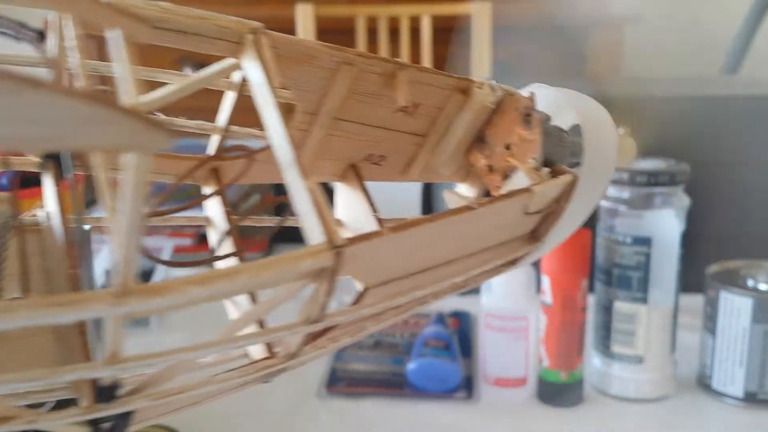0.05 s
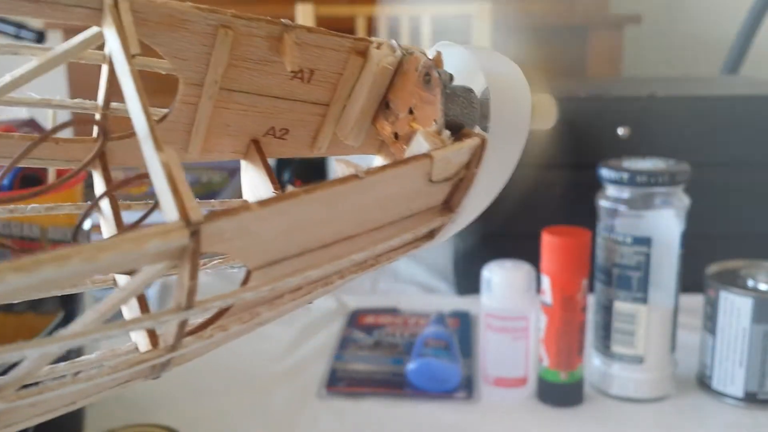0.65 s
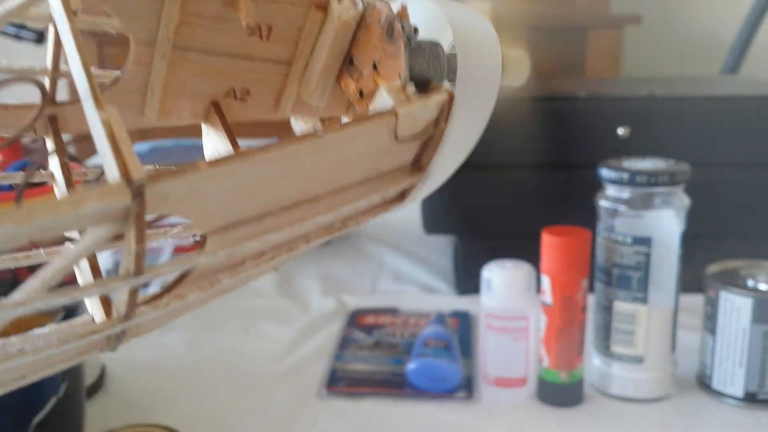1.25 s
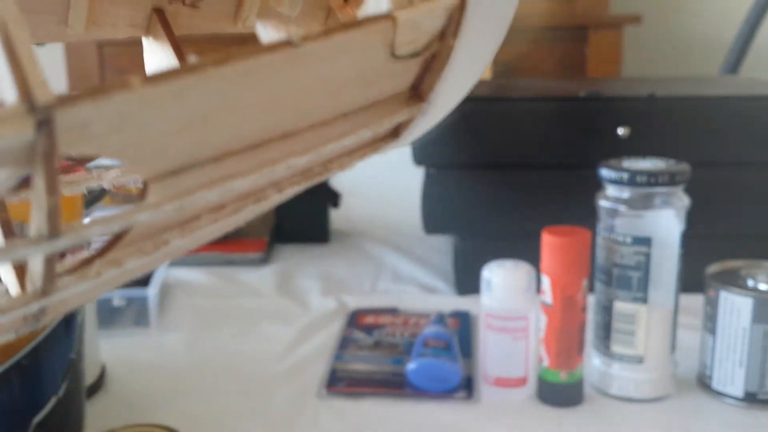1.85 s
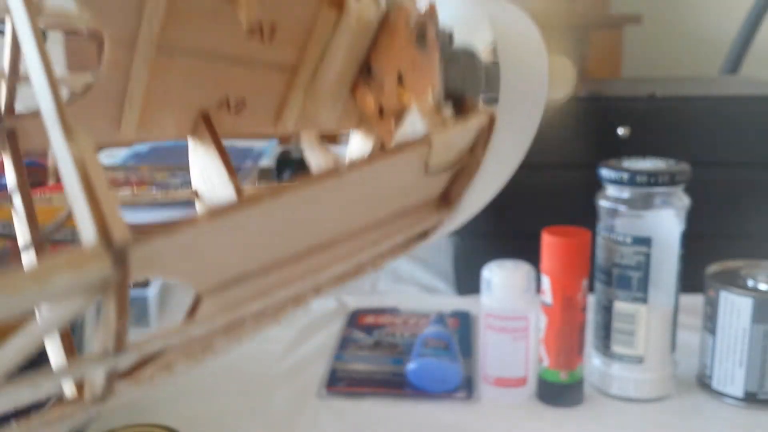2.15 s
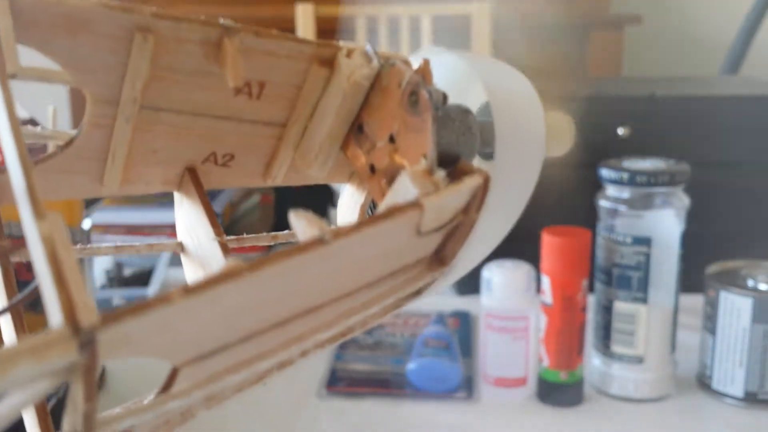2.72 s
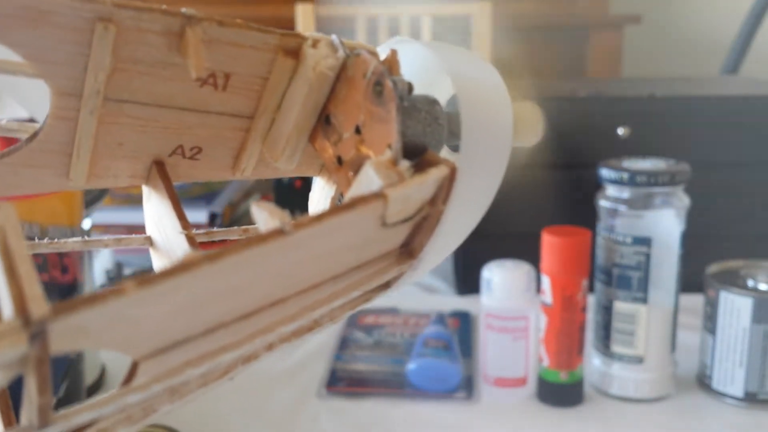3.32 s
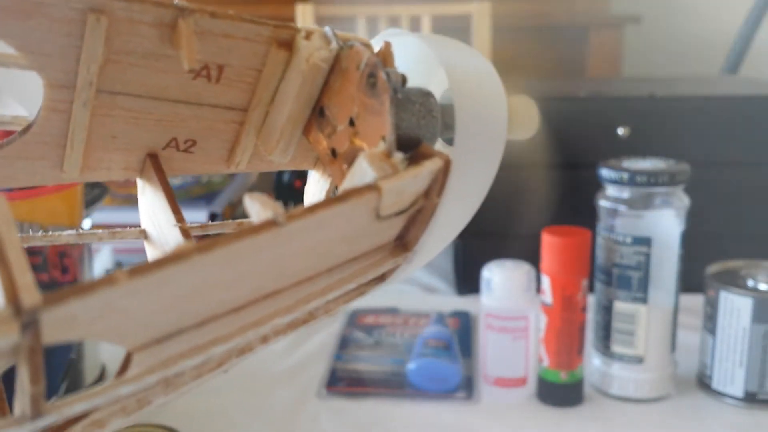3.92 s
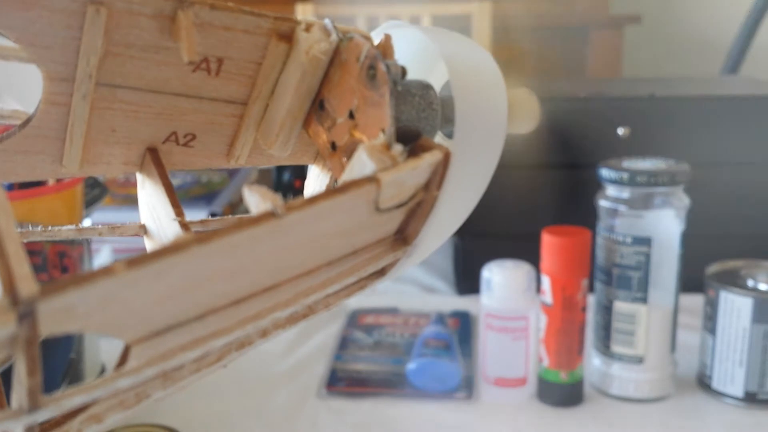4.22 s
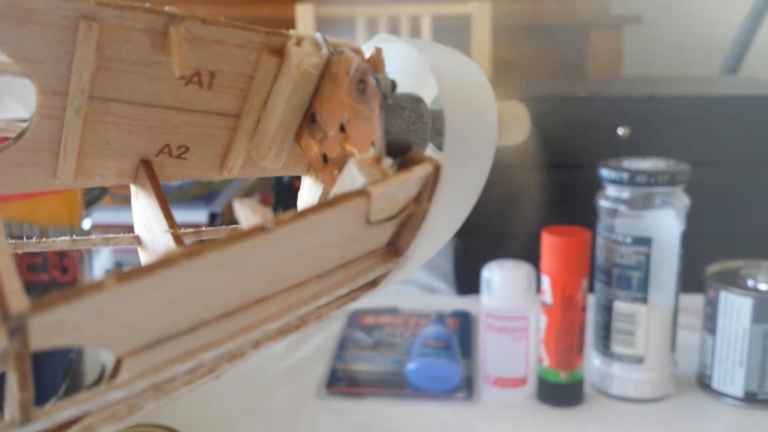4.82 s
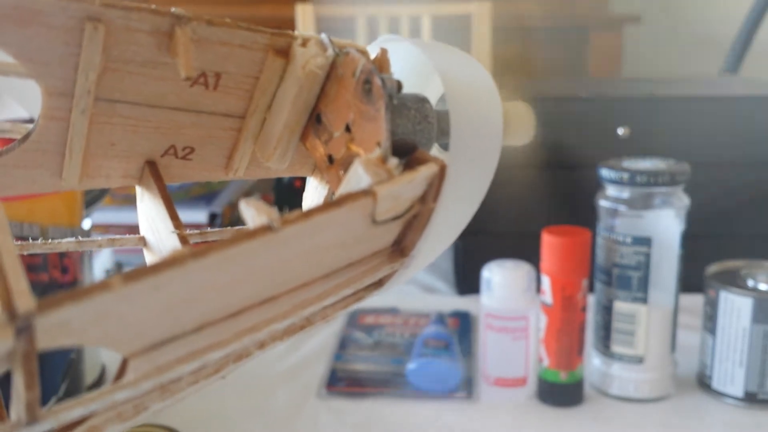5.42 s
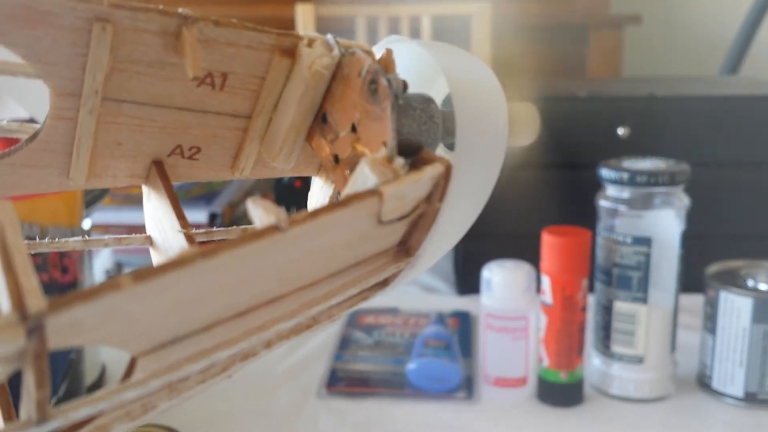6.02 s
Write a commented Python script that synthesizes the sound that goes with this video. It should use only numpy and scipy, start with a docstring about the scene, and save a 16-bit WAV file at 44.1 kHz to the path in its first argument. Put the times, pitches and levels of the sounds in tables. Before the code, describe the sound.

Rapid little pops and crisp metallic ticks come from a model aircraft engine running without a break, close by and a little to the right. The pulses carry a slight hiss and set a small room humming faintly. The pace eases a little from start to finish, and three barely audible thuds of a shifting grip fall from about halfway on, over a faint background rumble.

```python
"""A tiny gas-driven piston engine ticks over in a hand-held balsa model aircraft above a workbench.
From the start it is close to the right microphone, turning about 19 times a second. Each turn gives an
exhaust puff, a rattling click of the inlet valve, then a faint tick of play in the crank. As it slows,
its pulses sweep through the low notes of a small room, which hum. From 2.7 s on, the hand softly bumps
the model three times. By the end the engine is down to about 17 turns a second."""
import sys
import numpy as np
from scipy import signal
from scipy.io import wavfile
from scipy.ndimage import map_coordinates

SR = 44100
rng = np.random.default_rng(int(sys.argv[2]) if len(sys.argv) > 2 else 0)


def wav_record(signal):
    """Record a signal, one row per channel, as 16-bit PCM in the file named by sys.argv[1]."""
    frames = np.transpose(np.atleast_2d(signal))
    bounded = np.clip(frames, -1, 1)
    # unit amplitude maps onto the largest positive 16-bit level
    quanta = np.round(bounded * 32767).astype(np.int16)
    wavfile.write(sys.argv[1], SR, quanta)


N = 271642
TIME = np.arange(N) / SR

# how fast the shaft turns: (time [s], speed [turns per second])
SHAFT_SPEED = [(0.0, 19.033), (0.94, 18.522), (1.73, 18.22), (2.37, 18.521), (2.93, 18.161), (3.83, 17.985),
               (4.73, 17.571), (5.12, 17.259), (5.76, 17.19), (6.16, 16.859)]
# how loud the strokes are as the model is moved about: (time [s], level [dB])
STROKE_LOUDNESS = [(0, -1.1), (1.1, -0.65), (1.7, 1.94), (2.9, 0.25), (3.3, 0.97), (4.3, 0.9), (5.3, -1.5),
                   (6.1, 1.4)]
# tone of the push of gas: (frequency [Hz], level [dB])
PUSH_TONE = [(20.0, -15.0), (40.0, -15.0), (80.0, -15.0), (150.0, 11.5), (280.0, 8.6), (560.0, 5.4),
             (900.0, 3.9), (1250.0, 5.5), (1600.0, -15.0), (2100.0, -0.6), (3000.0, -4.6), (6000.0, -16.6),
             (15000.0, -36.6)]
# ringing notes of the exhaust port and cylinder: (frequency [Hz], width [Hz], level [dB])
PORT_NOTES = [(1800, 108, -4), (2890, 172, 7.5), (3330, 1230, 0.5), (4370, 690, 0.5), (5354, 440, -6),
              (7210, 700, 0.5), (8540, 460, 6), (9000, 1000, -7.5)]
# tone of the hissing jet: (frequency [Hz], level [dB])
JET_TONE = [(200, -7.5), (1000, -7), (2200, -3), (3000, -10), (5000, 5), (7000, -1), (9700, 5), (10800, -5),
            (12000, 0.5), (13500, -5), (14500, -9), (16000, -48)]
# knocks within one turn: (delay after the exhaust [turns], level [dB], random spread [dB])
KNOCKS = [(.396, 0, .7), (.414, -4, 1.2), (.423, -3, 1.2), (.436, -5, 1.2), (.465, -17, 2),
          (.642, -14, 1.5), (.656, -20, 2)]
# ringing notes of the valve and cylinder head: (frequency [Hz], width [Hz], level [dB])
HEAD_NOTES = [(2920, 174, 2.5), (4570, 880, -2), (4845, 580, 7), (5740, 2480, 4.5), (6890, 1290, 8.5),
              (8730, 544, 8), (10600, 550, -28), (11390, 620, -1.5), (12300, 410, 2), (13150, 480, 0),
              (14100, 1200, -2.5)]
# dulling at the left microphone, shaded by the case it sits in: (frequency [Hz], level [dB])
LEFT_SHADE = [(100, -6), (550, -4.5), (1200, -0.5), (2800, -13), (4200, -17), (6000, -14.5), (8500, -25),
              (11000, -8.5), (14000, -15)]
# sound thrown past the microphone into the room as the model is turned: (time [s], level [dB])
ROOM_SPILL = [(0, -4.5), (1.1, -6), (1.7, -8.5), (3, -8), (4.5, -8), (6.1, -8)]
# tone of the room's echoes: (frequency [Hz], level [dB])
ECHO_TONE = [(60, -82), (310, -32), (450, -2.5), (800, 1), (1400, -5), (1900, -5), (2900, -5.5),
             (4200, -3.5), (6300, -1.5), (8500, -7.5), (11000, -2.5), (14000, -2.5), (16000, -14)]
# how long the echoes last: (frequency [Hz], time to fade by 60 dB [s])
ECHO_FADE = [(200, 0.19), (1000, 1), (4000, 0.38), (8000, 0.2), (15000, 0.24)]
# the room's own low notes:
# (frequency [Hz], level [dB], time to fade by 60 dB [s], sign at the microphones [+1 or -1])
ROOM_NOTES = [(145.5, -42.5, 0.16, 1), (189.8, -40.7, 0.4, 1), (231.2, -38.7, 0.17, 1),
              (255.9, -35.9, 0.2, 1), (283.8, -36.0, 0.18, 1), (316.7, -40.0, 0.26, 1),
              (345.7, -50.7, 0.35, 1), (361.2, -44.8, 0.12, 1), (397.9, -53.7, 0.33, 1),
              (421.8, -55.5, 0.45, 1), (458.0, -54.6, 0.43, 1), (532.4, -44.6, 0.13, 1),
              (599.6, -55.0, 0.16, -1), (702.2, -48.9, 0.12, -1)]
# soft bumps of the hand on the model: (time [s], level [dB], frequency [Hz])
HAND_BUMPS = [(2.68, -40, 45), (4.435, -38, 85), (5.076, -33, 77)]
# tone of the steady rumble and hiss: (frequency [Hz], level [dB])
BACKGROUND_TONE = [(15, -9), (35, -6), (50, -14), (70, -7), (120, -0.5), (300, -4.5), (1500, -15),
                   (4000, -23), (8000, -23), (14000, -25), (15500, -52)]


def gas_push(rebound=0.44, rebound_s=.00105):
    """The exhaust port opens: a push of gas, then a suck as the cylinder empties."""
    opening = late(strokes(0, spread_db=.3, jitter_s=.00001), .00038)
    wave = opening - rebound * late(opening, rebound_s)
    return gain(stroke_db(follow=.6)) * colour(wave, PUSH_TONE)


def exhaust(pop_db=-29, whistle_db=-34, jet_db=-32.5, blow_s=.0023, rebound=.67, round_trip_s=.00126):
    """A pop rings the port and bounces back upside down; a brief jet of gas hisses and whistles."""
    opening = strokes(0, spread_db=.5, jitter_s=.00001)
    t = np.arange(600) / SR
    puff_shape = np.exp(-(t / blow_s) ** 2) * (1 - np.exp(-t / .00012))
    jet = through(opening, puff_shape) * rng.standard_normal(N)
    cylinder_echo = late(opening, round_trip_s + .00002 * drift(6))
    pop = gain(pop_db) * normalise(ring(opening - rebound * cylinder_echo, PORT_NOTES))
    whistle = gain(whistle_db) * normalise(ring(treble(jet, 5800), PORT_NOTES))
    hiss = gain(jet_db) * normalise(colour(jet, JET_TONE))
    return gain(stroke_db(follow=.74)) * (pop + whistle + hiss)


def valve_and_crank(level_db=-30, scrape_s=.0016):
    """The piston knocks the valve ball, which rattles on its seat; then the loose crank ticks."""
    knocks = sum(gain(db) * strokes(delay, spread, jitter_s=.000015) for delay, db, spread in KNOCKS)
    scrape_shape = np.exp(-np.arange(200) / SR / scrape_s)
    scrape = through(knocks, scrape_shape) * rng.standard_normal(N)
    clicks = ring(normalise(knocks) + normalise(scrape), HEAD_NOTES)
    return gain(level_db + stroke_db(follow=.83)) * normalise(clicks)


def strokes(delay_turns, spread_db, jitter_s, start_turn=-.2604):
    """One sharp click each time the shaft passes the same point in its turn."""
    turns = start_turn + np.cumsum(curve(SHAFT_SPEED)) / SR - delay_turns
    times = np.interp(np.arange(np.ceil(turns[0]), turns[-1]), turns, TIME)
    size, slip = rng.standard_normal((len(times), 2)).T
    centres = (times + jitter_s * slip)[:, None] * SR
    # spread each click over nearby samples, so it can fall between two of them
    nearby = centres.astype(int) + np.arange(-8, 9)
    shape = np.sinc(nearby - centres) * np.cos((nearby - centres) * np.pi / 18) ** 2
    clicks = gain(spread_db * size)[:, None] * shape
    return np.bincount(np.clip(nearby, 0, N - 1).ravel(), clicks.ravel(), N)


def stroke_db(follow, uneven_db=-.06):
    """A level in dB that partly follows the engine's loudness and wavers slightly."""
    return follow * curve(STROKE_LOUDNESS) + uneven_db * drift(2.395)


def ring(x, notes):
    """Small metal parts ring briefly and brightly; wider notes die sooner."""
    t = np.arange(512) / SR
    ringing = sum((-1) ** k * gain(db) * width * np.exp(-np.pi * width * t) * np.cos(2 * np.pi * hz * t)
                  for k, (hz, width, db) in enumerate(notes))
    return through(x, ringing)


def direct_and_bench(x, bench_db=-11, bench_s=.0019):
    """Sound arrives straight and bounces off the bench, along a path that sways with the hand."""
    sway_s = .00002 * drift(1.213)
    right = x + gain(bench_db) * late(x, bench_s + sway_s)
    shaded = colour(late(x, .00021), LEFT_SHADE)
    # on the shaded side, treble also bounces in from things nearby
    bounce = gain(curve(ROOM_SPILL)) * late(treble(shaded, 3500), .00081 + 2 * sway_s)
    return np.array([shaded + bounce, right])


def room_echoes(x, level_db=-2, first_wall_s=.0082, early_s=.012, alike_hz=700, size=16000):
    """Many echoes blur together, the first walls strongest; both microphones get much the same bass."""
    t = np.arange(size) / SR
    echoes = rng.choice([-1., 1.], (2, size)) * (rng.random((2, size)) < 1 / 8)
    onset = np.clip((t - first_wall_s) / .0041 + 1, 0, 1)
    early_boost = 1 + np.exp(-abs(t - first_wall_s) / early_s)
    # split into frequency bands, so each can fade at its own pace
    hz, frame_s, bands = signal.stft(echoes * onset * early_boost, SR, nperseg=256)
    alike = 1 / (1 + (hz[:, None] / alike_hz) ** 2)
    bands[1] = alike * bands[0] + np.sqrt(1 - alike ** 2) * bands[1]
    bands *= gain(-60 * frame_s / look_up(ECHO_FADE, hz)[:, None])
    bands /= np.sqrt(np.sum(abs(bands) ** 2, axis=2, keepdims=True))  # equal energy in each band
    tails = signal.istft(bands, SR, nperseg=256)[1]
    spill = colour(x * gain(level_db + curve(ROOM_SPILL)), ECHO_TONE)
    return np.array([through(spill, tail / np.linalg.norm(tail)) for tail in tails])


def room_hum(left_db=1.5, right_db=3.5, spill_follow=.38):
    """Each push rings the room's low notes; one swells when a multiple of the shaft speed meets it."""
    t = np.arange(SR // 2) / SR
    notes = sum(sign * gain(db - 60 * t / fade_s) * np.cos(2 * np.pi * hz * t)
                for hz, db, fade_s, sign in ROOM_NOTES)
    build_up = 1 - np.exp(-t / .003)
    pushes = late(strokes(0, spread_db=.3, jitter_s=0), .00015)
    spill = pushes * gain(spill_follow * curve(ROOM_SPILL))
    return through(spill, notes * build_up) * gain([[left_db], [right_db]])


def hand_bumps(rise_s=.0043):
    """The hand shifts its grip: dull thuds that die quickly."""
    t = np.arange(5000) / SR
    shape = t / rise_s * np.exp(1 - t / rise_s)
    thuds = np.zeros(N)
    for start_s, db, hz in HAND_BUMPS:
        tap = signal.unit_impulse(N, round(start_s * SR))
        thuds += gain(db) * through(tap, shape * np.sin(2 * np.pi * hz * t))
    return thuds


def background(left_db=-54, right_db=-51, alike=.34):
    """The room rumbles and the propeller hisses softly."""
    shared, left, right = (normalise(colour(rng.standard_normal(N), BACKGROUND_TONE)) for _ in range(3))
    noise = alike * shared + (1 - alike) * np.array([left, right])
    return gain([[left_db], [right_db]]) * normalise(noise)


def gain(db):
    """Turns decibels into a number to multiply by."""
    return 10 ** (np.asarray(db) / 20)


def normalise(x):
    """Scales a signal to an average power of 1."""
    return x / np.sqrt(np.mean(x ** 2) + 1e-20)


def curve(rows):
    """Joins the points of a time table, giving a value for every sample."""
    return np.interp(TIME, *np.transpose(rows))


def look_up(rows, hz):
    """Reads between the points of a frequency table, with octaves evenly spaced."""
    row_hz, values = np.transpose(rows)
    return np.interp(np.log(hz + 1), np.log(row_hz + 1), values)


def through(x, response):
    """Every sample of x sets off its own copy of the response (convolution)."""
    return signal.oaconvolve(x, response)[:N]


def colour(x, tone, size=4096):
    """Filters a sound to give it the tone in a table."""
    hz = abs(np.fft.fftfreq(size, 1 / SR))
    log_gain = np.log(gain(look_up(tone, hz)))
    spectrum = np.exp(np.conj(signal.hilbert(log_gain)))  # rings after a click, never before
    return through(x, np.fft.ifft(spectrum).real[:size // 2])


def treble(x, hz):
    """Keeps the sound above the given frequency."""
    return signal.sosfilt(signal.butter(2, hz, "high", fs=SR, output="sos"), x)


def late(x, seconds):
    """Delays a sound by a steady or changing time."""
    return map_coordinates(x, [(TIME - seconds) * SR], order=3)


def drift(fastest_hz):
    """A slow random wander, about 1 in size."""
    t = np.arange(0, N / SR + 1, 1 / 100)
    rates = np.geomspace(fastest_hz / 10, fastest_hz, 12)
    waves = sum(np.sin(2 * np.pi * (hz * t + rng.random())) / np.sqrt(hz) for hz in rates)
    return np.interp(TIME, t, normalise(waves))


def scene():
    """The engine, its room and the hand that holds it."""
    engine = gas_push() + exhaust() + valve_and_crank()
    # as the hand moves, one pattern of echoes gives way to another
    angle = drift(1.475)
    walls = room_echoes(engine * np.cos(angle)) + room_echoes(engine * np.sin(angle))
    return direct_and_bench(engine) + walls + room_hum() + hand_bumps() + background()


def record(dry):
    """Cuts off the highest treble, above 16500 Hz."""
    low_pass = signal.firwin(511, 16500, window=("kaiser", 9), fs=SR)
    return signal.oaconvolve(dry, low_pass[None], "same")


dry = scene()
out = record(dry)
wav_record(out)
```